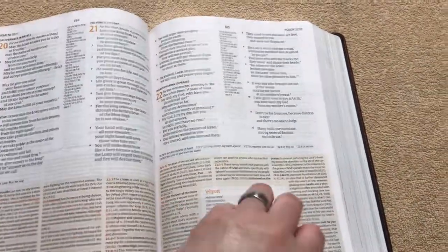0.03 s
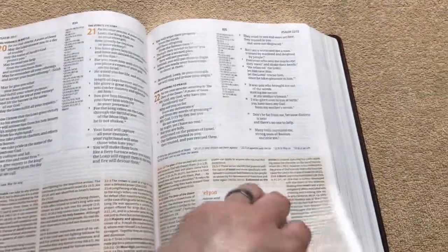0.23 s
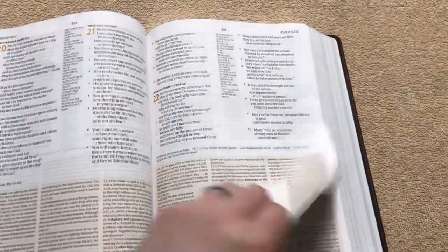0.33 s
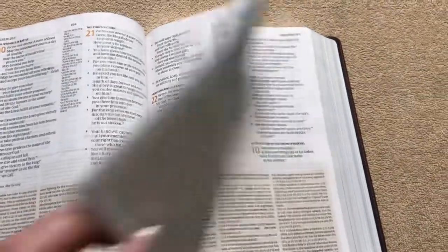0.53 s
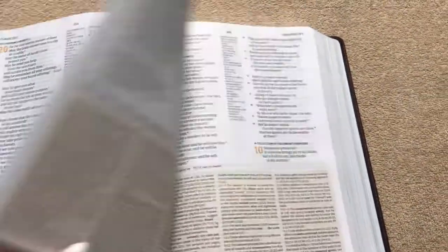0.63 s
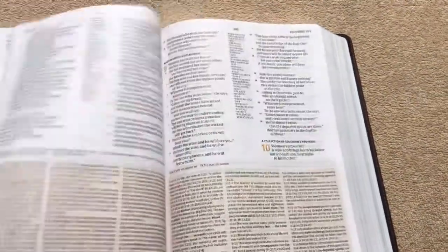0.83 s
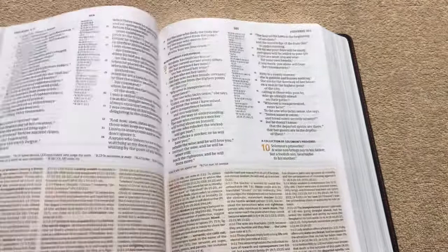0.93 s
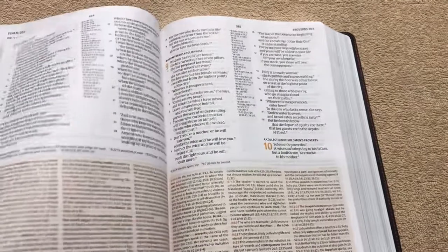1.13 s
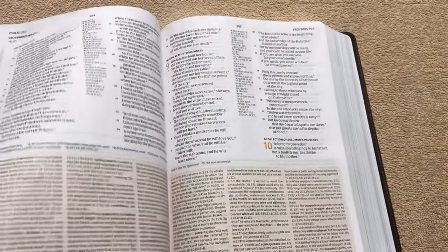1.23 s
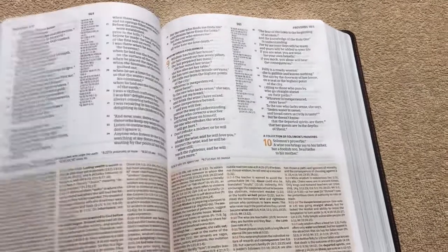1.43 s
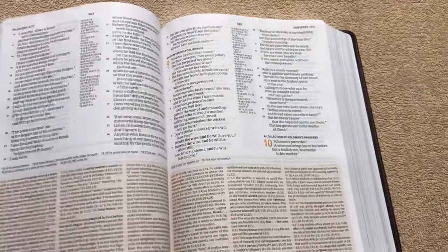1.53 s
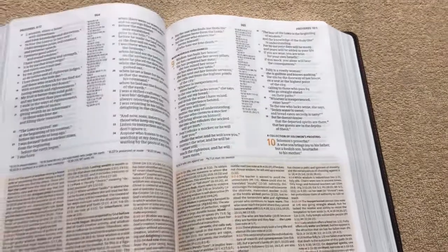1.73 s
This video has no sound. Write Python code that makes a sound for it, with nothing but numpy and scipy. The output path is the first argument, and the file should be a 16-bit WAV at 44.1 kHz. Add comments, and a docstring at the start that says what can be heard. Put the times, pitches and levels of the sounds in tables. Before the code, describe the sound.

A thin book page is turned, heard close in a quiet room with a faint wavering low hum and hiss. A fingertip rubs and judders softly at 0.1-0.33 s, with small ticks from 0.4 s. A sharp snap at 0.65 s leads into dense crisp crackling from 0.76 to 0.95 s. Light sliding follows, a crinkle at 1.37 s, a final dull papery flap around 1.5 s, then quiet.

```python
"""In a quiet room, a thin page of a thick book is turned by hand. A distant machine hums (wavering sines)
under room rumble and hiss, paper slides on paper and skin (three bands of grainy noise), a fingertip
judders over the sheet in quick slips (pulsed noise over a low drag), and the sheet snaps and buckles
(short noise bursts rung through its resonances)."""
import sys
import numpy as np
from scipy import signal
from scipy.fft import rfft, irfft, next_fast_len
from scipy.io import wavfile
from scipy.ndimage import uniform_filter1d, map_coordinates

SR = 44100
rng = np.random.default_rng(int(sys.argv[2]) if len(sys.argv) > 2 else 0)


def wrap_up_sound(samples):
    """Save the sound to the file named by the first command line argument, as 16-bit audio."""
    columns = np.atleast_2d(samples).T
    # keep every value between -1 and 1, then stretch to whole-number steps
    tamed = np.clip(columns, -1, 1)
    steps = np.round(tamed * 32767).astype(np.int16)
    wavfile.write(sys.argv[1], SR, steps)


N = 79380  # 1.8 s


def amp(db):
    """Decibels to a linear gain."""
    return 10 ** (np.asarray(db) / 20)


def unit(x):
    """The signal scaled to rms 1."""
    return x / np.sqrt(np.mean(x ** 2) + 1e-20)


def curves(rows):
    """One value per sample for each column after the time, in straight lines between rows."""
    s, *cols = np.transpose(rows)
    return [np.interp(np.arange(N) / SR, s, c) for c in cols]


def wobble(rate):
    """A smooth random curve, rate knots a second."""
    return map_coordinates(rng.standard_normal(N // 10), [np.arange(N) * rate / SR])


def filtered(x, response):
    """The signal through a complex response of frequency, padded so that tails do not wrap to the start."""
    m = next_fast_len(len(x) + 2048)
    return irfft(rfft(x, m) * response(np.fft.rfftfreq(m, 1 / SR)), m)[:len(x)]


def peak(f, hz, width_hz):
    """A causal resonance with gain 1 at its centre."""
    return 1j * f * width_hz / (hz * hz - f * f + 1j * f * width_hz)


def hiss(spectrum, patchy_db, grit_db):
    """Coloured noise of rms 1, in time-frequency patches of random gain, grainy in time."""
    grainy = rng.standard_normal(N) * amp(grit_db * wobble(900))
    z = signal.stft(grainy, nperseg=512)[2]
    field = uniform_filter1d(rng.standard_normal(z.shape), 6, axis=0)  # smooth over 6 bins
    field = uniform_filter1d(field, 8, axis=1)  # and over 8 frames
    patchy = signal.istft(z * amp(patchy_db * unit(field)), nperseg=512)[1][:N]
    f, db = np.transpose(spectrum)

    def colour(hz):
        return amp(np.interp(np.log(hz + 1), np.log(f), db, left=-120, right=-120))

    return unit(filtered(patchy, colour))


def room():
    """A far machine's harmonics, wavering in level and phase, over rumble and hiss."""
    # steady harmonics: [multiple of the fundamental, sine peak level/dB before the lift]
    steady = [(1, -67), (4, -68), (5, -67.5), (8, -71.5)]
    # swelling harmonics: [t/s, second multiple level/dB, third multiple level/dB], also before the lift
    swell = [(0.0, -55, -56.5), (0.1, -59.5, -62.5), (0.174, -67, -56.5), (0.264, -77, -74),
             (0.366, -59, -61), (0.476, -65, -58.5), (0.506, -54, -63), (0.656, -60.5, -58),
             (0.69, -50, -55), (0.726, -58, -62.5), (0.976, -58, -54), (1.638, -55.5, -61),
             (1.674, -59, -81), (1.8, -60.5, -70.5)]
    # room noise colour: [f/Hz, relative density/dB per Hz]
    room_colour = [(18, -56), (30, -15), (55, 1.5), (90, -7.5), (150, -5), (300, -9), (420, -19.5),
                   (1000, -25.5), (2500, -36.5), (5000, -37.5), (15700, -45), (16100, -75)]
    hum_hz, lift_db, waver_db, waver_rad = 35.74, 1, 1.5, 1.25
    noise_db = -58  # rms
    t = np.arange(N) / SR
    hum = np.zeros(N)
    for k, db in list(steady) + list(zip((2, 3), curves(swell))):
        level = amp(db + lift_db + waver_db * wobble(5.11))
        phase = waver_rad * wobble(5.03) + rng.uniform(0, 2 * np.pi)
        hum += level * np.sin(2 * np.pi * k * hum_hz * t + phase)
    return hum + amp(noise_db) * hiss(room_colour, 3.3, 0.33)


def rubbing():
    """Paper slides on paper and skin: friction noise in three bands, each with its own level curve."""
    # sliding levels: [t/s, body level/dB, rustle level/dB, treble level/dB]
    slide = [(0, -79, -82, -93.5), (.04, -66, -73, -89), (.08, -64.5, -67, -73), (.12, -65, -79, -88),
             (.2, -59.5, -64, -71.5), (.28, -64, -64, -74), (.3, -61, -60, -65), (.322, -58.5, -61, -71),
             (.335, -63, -69, -71), (.365, -58, -64.5, -71.5), (.395, -69, -77.5, -84),
             (.5, -67.5, -77, -84), (.635, -71.5, -79, -90), (.66, -68, -70, -64.5), (.72, -63, -62, -68),
             (.75, -66.5, -66, -66), (.79, -58.5, -62.5, -69.5), (.88, -55.5, -65.5, -66),
             (.94, -66, -57.5, -65), (1.0, -65.5, -66, -67.5), (1.04, -66.5, -65.5, -65.5),
             (1.065, -66.5, -67.5, -75), (1.09, -62.5, -61, -67.5), (1.135, -68, -68.5, -70.5),
             (1.16, -62, -63, -74.5), (1.24, -67, -68.5, -75), (1.31, -68, -60, -63.5),
             (1.35, -59, -56, -68), (1.41, -60.5, -59.5, -69), (1.435, -60, -64, -70),
             (1.454, -56, -52, -61), (1.459, -64, -64, -76), (1.47, -73, -72, -77), (1.478, -51, -52, -61),
             (1.486, -48, -58, -70), (1.49, -52, -83, -82), (1.503, -60, -69, -71),
             (1.508, -46.5, -46.5, -71.5), (1.523, -45.5, -54.5, -68), (1.529, -63, -68, -82),
             (1.54, -66, -81, -91.5), (1.6, -74, -86, -95), (1.8, -75.5, -94.5, -97)]
    # colours of the three bands: [f/Hz, relative density/dB per Hz]
    body_colour = [(250, -36), (450, -14.5), (700, -5.5), (1200, 1.5), (2200, -1.5), (3500, -17.5),
                   (5000, -76)]
    rustle_colour = [(1200, -50), (2300, 2.5), (4000, 4), (6000, -0.5), (8000, -17), (11000, -72)]
    treble_colour = [(4000, -40), (7000, 3), (10500, -1.5), (13500, 2), (15700, -2.5), (16100, -54)]
    body_db, rustle_db, treble_db = curves(slide)
    body = amp(body_db) * hiss(body_colour, 1.9, 1.5)
    rustle = amp(rustle_db) * hiss(rustle_colour, 2.7, 0.97)
    treble = amp(treble_db) * hiss(treble_colour, 1.2, .8)
    return body + rustle + treble


def fingertip():
    """The skin sticks and slips, one puff of friction noise a slip; the book rumbles under the drag."""
    # fingertip travel: [t/s, slips so far]
    travel = [(.111, -1), (.1269, 1), (.1396, 2), (.195, 9), (.228, 12), (.2947, 20), (.3005, 21),
              (.313, 22), (.3197, 23), (.326, 24)]
    # finger pressure, setting slips and drag together: [t/s, level/dB]
    press = [(0.111, -72), (.13, -59), (.14, -57.5), (.155, -65), (.178, -57), (.19, -52.5), (.235, -53),
             (.26, -48), (.295, -56.5), (.32, -46.5), (.325, -68)]
    # colours of the slips and of the drag: [f/Hz, relative density/dB per Hz]
    slip_colour = [(600, -26), (1600, -4), (2300, -11), (3000, 2), (5500, -5.5), (8000, -11.5),
                   (10500, -13), (13000, -10.5), (15700, -17.5), (16100, -50)]
    drag_colour = [(120, -26), (220, 3), (350, -2.5), (550, -7.5), (800, -15)]
    sharpness, scatter_db, drag_db = 2.9, 1, -10
    count, = curves(travel)
    # the touch fades in and out over 10 ms
    before = [(0, -120), (press[0][0] - .01, -120)]
    after = [(press[-1][0] + .01, -120)]
    press_db, = curves(before + list(press) + after)
    size = amp(scatter_db * rng.standard_normal(40))[np.round(count).astype(int) + 1]
    gate = np.cos(np.pi * count) ** 2  # fully open at each whole slip, shut halfway between
    slips = size * gate ** sharpness * hiss(slip_colour, 1.5, 1.1)
    drag = amp(drag_db) * hiss(drag_colour, 1.5, 1.1)
    return amp(press_db) * (slips + drag)


def buckles():
    """Each buckle is a gritty burst around its pitch plus a short treble crack, rung through the sheet."""
    # buckles and snaps: [t/s, burst peak level/dB before the sheet rings, pitch f/Hz, rise/s, t60/s,
    # treble crack peak level/dB relative to the burst]
    buckle_rows = [(.418, -42.5, 1160, 0.0011, 0.02, -25), (.421, -51, 288, 0.0043, 0.046, -40),
                   (0.433, -53, 2000, .001, 0.0233, -20), (0.4449, -47, 1550, 0.00067, 0.02, -28),
                   (.569, -53, 4070, 0.00043, 0.018, -11), (.603, -66.5, 3020, .0003, 0.0088, 15),
                   (0.6389, -51, 5000, 0.000062, 0.0035, 3), (0.6412, -36, 3250, 0.00018, 0.007, 3),
                   (.6535, -59, 2200, .001, .01, -10.5), (0.6562, -25.5, 5000, 0.00023, 0.0044, 4),
                   (.6575, -42, 2280, 0.000424, 0.01, -10), (0.6968, -43.5, 1820, .0003, 0.014, -22.5),
                   (.7602, -22.5, 3120, 0.0003, 0.028, -29), (.7605, -38.5, 580, .001, .03, -40),
                   (.7628, -30, 1120, .0005, 0.022, -35), (0.7994, -32.5, 2200, 0.00037, 0.012, -27),
                   (.802, -33, 1040, 0.000384, 0.015, -32), (.816, -47, 1500, 0.00078, 0.0177, -23),
                   (0.8333, -33.5, 960, 0.00058, 0.026, -28), (.8377, -35, 5000, 0.00049, 0.0081, -20),
                   (.845, -31.5, 2640, .0003, 0.0069, -12), (0.8622, -39.5, 295, 0.0023, 0.12, -40),
                   (.862, -29, 2200, 0.00047, 0.022, -33), (0.8728, -30.5, 2460, .0007, 0.0071, -28),
                   (0.893, -24.5, 885, 0.00085, 0.0146, -33.5), (0.895, -27, 4300, 0.00049, 0.024, -23),
                   (.897, -39.5, 280, 0.0035, 0.13, -40), (0.902, -34, 2400, 0.00098, .025, -25),
                   (.901, -32, 1170, 0.0025, 0.042, -20), (0.916, -24, 2400, 0.00099, .015, -14),
                   (.918, -30.5, 990, 0.00067, 0.023, -31.5), (1.085, -52, 2400, 0.00088, .01, -6),
                   (1.089, -52.5, 2400, 0.00071, 0.013, 2), (1.372, -33, 1840, .003, 0.0066, 7.5),
                   (1.4815, -37.5, 1600, 0.00057, 0.012, -5.5), (1.485, -41.5, 1270, 0.00285, 0.074, -29),
                   (1.505, -29.5, 1520, 0.0048, 0.043, -34.5), (1.5127, -29.5, 1400, .0003, 0.017, -32),
                   (1.5098, -31.5, 2880, 0.00069, 0.012, -37), (1.511, -42, 280, 0.0033, 0.067, -40),
                   (1.513, -36.5, 640, 0.0011, 0.025, -35)]
    # sheet resonances added to the direct sound: [f/Hz, width/Hz, level/dB]
    sheet_modes = [(280, 74, -4.5), (640, 69, -0.5), (885, 40, 0.5), (1120, 73, -2.5), (2400, 150, -5),
                   (3060, 720, -16.5)]
    width_share = 1.91  # band width over pitch
    grit_db, snap = 5, 6.7  # roughness of the burst; height of the sudden give over the noise
    crack_hz, crack_faster = 11140, 1.27  # centre and width of the crack; how much sooner it dies
    lag_s = 0.001227
    knock_hz, knock_width_hz = 2200, 213  # below this pitch the ring is stronger than the burst
    dull_hz = 5000  # the burst fades above
    shiver_db, shiver_t60_s = -12, 0.15

    def late(f):
        """Bending waves carry the lows late: delay lag_s * (sqrt(1000 / f) - 1/2), none at 4 kHz."""
        return np.exp(-4j * np.pi * lag_s * np.sqrt(1000 * f) + 1j * np.pi * f * lag_s)

    out, t = np.zeros(N + SR), np.arange(SR // 8) / SR
    for s, db, hz, rise, t60, crack_db in buckle_rows:
        body_noise, crack_noise, grit_noise = rng.standard_normal((3, len(t)))
        grit = amp(grit_db * unit(uniform_filter1d(grit_noise, size=12)))
        kick = snap * (t // (1 / SR) == round(rise * SR))  # the sudden give as the rise ends

        def shape(life):
            return np.minimum(t / rise, 1) * amp(-60 * np.maximum(t - rise, 0) / life)

        def body_response(f):
            knock = 1 + knock_hz / hz * peak(f, hz, knock_width_hz)
            band = peak(f, hz, width_share * hz) ** 2
            return late(f) * knock * band / (1 + 1j * f / dull_hz) ** 2

        body = filtered((body_noise * grit + kick) * shape(t60), body_response)
        crack = filtered((crack_noise + kick) * shape(t60 / crack_faster),
                         lambda f: peak(f, crack_hz, crack_hz) ** 2)
        both = body / np.abs(body).max() + amp(crack_db) * crack / np.abs(crack).max()
        out[round(s * SR):][:len(t)] += amp(db) * both
    rung = filtered(out[:N], lambda f: 1 + sum(amp(db) * peak(f, c, w) for c, w, db in sheet_modes))
    # the sheet and the room answer each buckle with a dull, dying shiver
    t = np.arange(SR // 4) / SR
    tail = rng.standard_normal(len(t)) * amp(-60 * t / shiver_t60_s) * np.minimum(t / 0.004, 1)
    tail = filtered(tail / np.linalg.norm(tail), lambda f: 1 / (1 + 1j * f / 5000))
    return rung + amp(shiver_db) * signal.fftconvolve(rung, tail)[:N]


def scene():
    """Room, sliding paper, fingertip and buckles summed into one channel."""
    return (room() + rubbing() + fingertip() + buckles())[None]


def record(dry):
    """Nothing is kept above the band limit of 16.9 kHz."""
    return filtered(dry[0], lambda hz: hz < 16900)[None]


dry = scene()
out = record(dry)
wrap_up_sound(out)
```